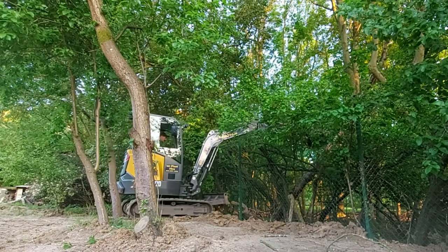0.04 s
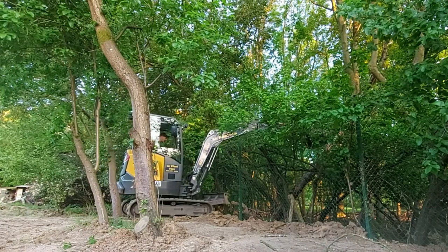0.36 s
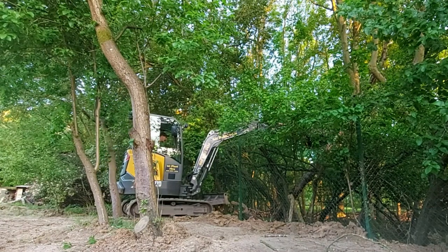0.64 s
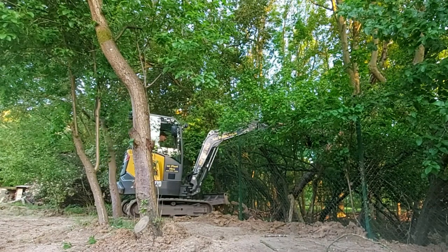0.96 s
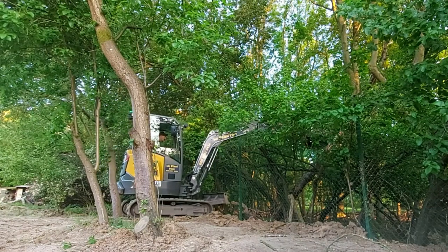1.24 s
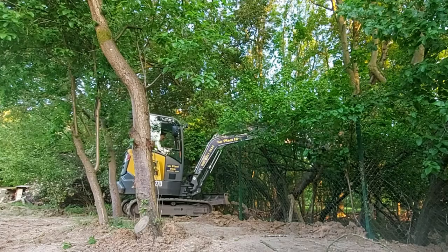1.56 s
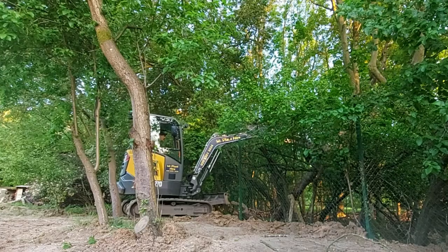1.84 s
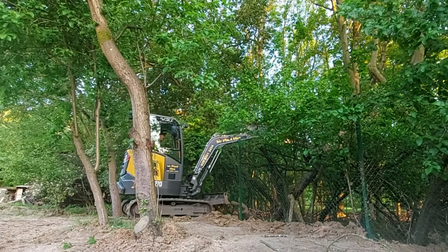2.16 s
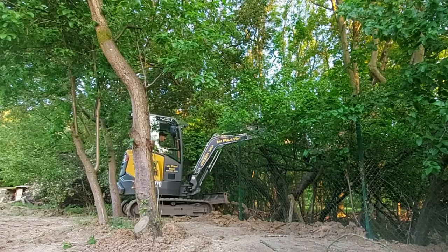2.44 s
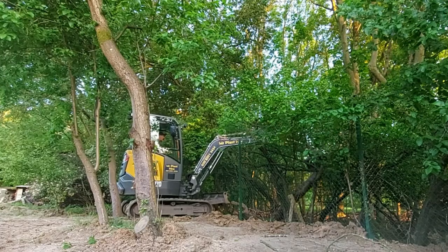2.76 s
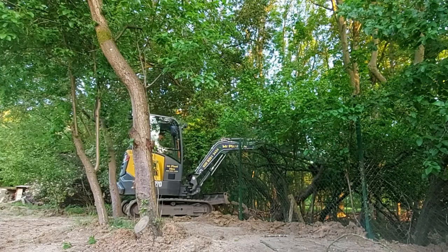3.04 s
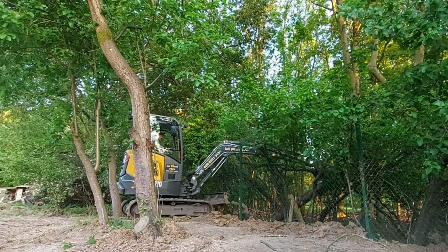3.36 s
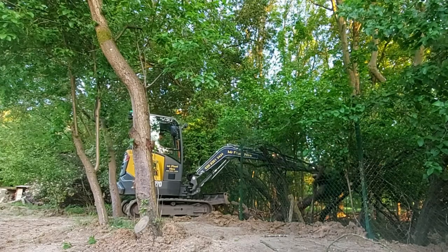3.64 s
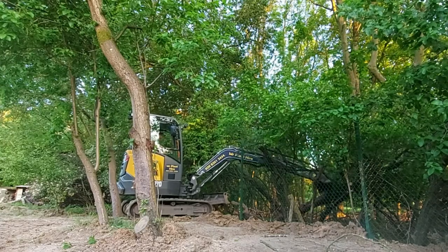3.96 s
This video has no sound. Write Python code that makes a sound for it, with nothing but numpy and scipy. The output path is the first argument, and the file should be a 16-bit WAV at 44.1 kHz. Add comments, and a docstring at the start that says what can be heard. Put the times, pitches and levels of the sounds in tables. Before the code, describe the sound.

A small diesel excavator runs steadily, clanks, then pushes through snapping branches and thrashing leaves.

```python
"""A small diesel excavator runs steadily some metres off in a wood; a bird whistles far away.
Its arm and bucket clank a few times, then press into a thicket, a little to the right: twigs snap,
branches crack and bump, leaves thrash. The engine is partials of the firing rate over combustion
noise, the clanks are a rattle over ringing steel, and the breaking wood is short noise bursts.
Hydraulics and distant foliage hiss; blows and whistles echo among the trees."""
import sys
import numpy as np
from scipy import signal
from scipy.fft import rfft, irfft, next_fast_len
from scipy.io import wavfile

SR = 44100
rng = np.random.default_rng(int(sys.argv[2]) if len(sys.argv) > 2 else 0)


def store_pcm(level_fs):
    """Save levels as 16-bit WAV."""
    pcm = np.round(np.clip(level_fs, -1, 1) * 32767).astype(np.int16)
    wavfile.write(sys.argv[1], SR, np.atleast_2d(pcm).T)


N = 176400
T = np.arange(N) / SR

ENGINE_LAG, BUCKET_LAG, THICKET_LAG = -9, 4.5, 12  # left behind right [samples]
TWIG_PAN_DB = np.array([[-1.4], [1.4]])  # left, right


def amp(db):
    """Decibels to gain."""
    return 10 ** (np.asarray(db) / 20)


def unit(x):
    """Scale to rms 1."""
    return x / np.sqrt(np.mean(x ** 2) + 1e-20)


def curve(points):
    """Breakpoints to a value per sample."""
    return np.interp(T, *np.transpose(points))


def read(points, hz):
    """Interpolate on a log-frequency axis."""
    f, value = np.transpose(points)
    return np.interp(np.log(hz + 1), np.log(f + 1), value)


def add(mix, start_s, sound):
    """Mix in a stereo sound, cropped to fit."""
    at = round(start_s * SR)
    sound = sound[:, max(-at, 0):]
    part = mix[:, max(at, 0):][:, :sound.shape[1]]
    part += sound[:, :part.shape[1]]


def drift(hz):
    """Random wander below hz, rms 1."""
    f = np.fft.rfftfreq(N, 1 / SR)
    return unit(irfft(rfft(rng.standard_normal(N)) / (1 + (f / hz) ** 4), N))


def noise(size, likeness, grain_db=0):
    """Stereo noise, left-right correlation = likeness; grain turns it into unequal clicks."""
    z = rng.standard_normal((3, size))
    z *= amp(grain_db * np.minimum(rng.exponential(1, (3, size)), 5))
    return unit(np.sqrt(likeness) * z[0] + np.sqrt(1 - likeness) * z[1:])


def colour(x, tone, lag, tilt_db_oct=0):
    """Shape the spectrum at equal power; delay the left side by lag samples."""
    size = next_fast_len(x.shape[1] + 256)
    f = np.fft.rfftfreq(size, 1 / SR)
    gain = unit(amp(read(tone, f) + tilt_db_oct * np.log2(f + 1)))
    delay = np.exp(-2j * np.pi * f / SR * np.array([[lag], [0]]))
    return irfft(rfft(x, size) * gain * delay, size)[:, :x.shape[1]]


def die_away(x, t60):
    """Decay each band at its own rate."""
    f, t, bands = signal.stft(x, SR, nperseg=256)
    decay = amp(-60 * t / read(t60, f)[:, None])
    return signal.istft(bands * decay, SR, nperseg=256)[1][:, :x.shape[1]]


def ring(modes, t, lag):
    """Decaying modes of random phase, in stereo."""
    late_s = t - np.array([[lag], [0]]) / SR
    return np.sqrt(2) * sum(amp(db - 60 * t / t60) * np.cos(2 * np.pi * (hz * late_s + rng.random()))
                            for hz, db, t60 in modes)


def engine(wobble=0.0042, wobble_hz=14.9, shimmer_db=0.5, clatter_db=-32.5):
    """Diesel: exhaust partials and a drone on the firing rate; clatter swells at each firing."""
    # engine speed (time [s], firing rate [Hz])
    speed = [(0.0, 62), (0.71, 62.6), (1.49, 61.4), (1.56, 62), (1.69, 61.6), (1.75, 61.7), (1.9, 60),
             (2.07, 62), (2.51, 62.1), (2.87, 61.0), (3.63, 61.2), (3.69, 61), (3.95, 62), (4.0, 60)]
    # exhaust and drive partials (multiple of firing rate, level [dB])
    orders = [(1, -26.5), (1.5, -66.5), (2, -22), (2.5, -42.5), (3, -41), (3.5, -63), (4, -36.5),
              (4.5, -40.5), (6, -49.5), (7, -51), (8, -53), (8.6, -52.5)]
    # exhaust swell (time [s], gain [dB])
    exhaust_gain = [(0, 1), (.6, 0.6), (1.5, 0.5), (2.1, 0), (2.9, -0.6), (3.5, 0.1), (4, 0.2)]
    # drone (time [s], level [dB])
    drone_level = [(0.0, -32), (0.08, -24), (0.37, -30), (0.6, -23.5), (0.78, -31.5), (0.98, -25.5),
                   (1.17, -29.5), (1.56, -25.5), (1.61, -50), (1.64, -28), (1.93, -23.5), (1.97, -34.5),
                   (2.17, -25.5), (2.41, -31), (2.62, -25), (2.87, -31.5), (2.99, -28), (4.0, -28)]
    # combustion and casing noise (frequency [Hz], relative level [dB])
    clatter_tone = [(8, -60), (25, -18), (45, -7), (90, 3.5), (160, -1.5), (280, 1.5), (370, -4),
                    (470, -12.5), (620, -14), (900, -13), (1400, -20.5), (2400, -21.5), (5000, -36),
                    (16000, -60)]
    rate_hz = curve(speed) * (1 + wobble * drift(wobble_hz))
    firings = np.cumsum(rate_hz) / SR - np.array([[ENGINE_LAG], [0]]) * rate_hz / SR

    def partial(order):
        return np.sqrt(2) * np.cos(2 * np.pi * (order * firings + rng.random()))

    exhaust = sum(amp(db + shimmer_db * drift(wobble_hz)) * partial(order) for order, db in orders)
    drone = amp(curve(drone_level)) * partial(order=5)
    phase = 2 * np.pi * firings[1]
    puffs = unit(np.exp(0.1 * np.cos(phase) + 0.18 * np.cos(phase / 2)))  # alternately strong, weak
    clatter = colour(noise(N, likeness=0.98) * puffs, clatter_tone, ENGINE_LAG)
    return amp(curve(exhaust_gain)) * exhaust + drone + amp(clatter_db) * clatter


def clanks(boom_rise_s=0.014):
    """Slack joints and the bucket knock: dense rattle, steel modes, low ring of the boom."""
    # knocks (time [s], rattle [dB], rise [s], tilt [dB/octave], boom [dB], steel [dB])
    knocks = [(1.553, -32, 0.0095, -4, -31, -42), (1.581, -15.5, 0.00086, 4, -31, -30.5),
              (1.594, -18, 0.0029, -2, -26, -29.5), (1.667, -40, .003, 10, -38, -60),
              (1.711, -19.5, .011, -0.5, -33, -39), (1.787, -26.5, .007, -1, -25.5, -42),
              (1.867, -21, .004, -3, -35, -38), (1.879, -18, 0.0056, -1.5, -26.5, -27),
              (1.96, -28.5, 0.009, -2, -30, -47), (2.2, -42, 0.0058, 1, -35.5, -54),
              (3.959, -25, 0.0037, 2, -40, -48), (3.976, -26, .004, 3, -29, -46)]
    # rattle spectrum (frequency [Hz], relative level [dB])
    rattle_tone = [(150, -31), (430, 3), (630, -12.5), (900, -0.5), (1400, -6), (2200, -4), (3300, -5),
                   (5000, -5), (7000, -16.5), (8500, -18), (9700, -39), (12000, -26), (16000, -42)]
    # rattle decay (frequency [Hz], T60 [s])
    rattle_t60 = [(300, 0.18), (1200, .21), (4000, 0.15), (12000, .1)]
    # steel modes (frequency [Hz], level [dB], T60 [s])
    steel_modes = [(872, -9, .3), (1125, -3, .16), (1238, -4, .2), (1357, -3, .26), (1460, -4, .2),
                   (1663, -6, .27), (1705, -7, .25), (1927, -7, .3), (2778, -13, .2), (3220, -10, .16),
                   (3871, -15, .22), (4307, -16, .15), (5297, -18, .16), (5868, -17, .18)]
    # boom modes (frequency [Hz], level [dB], T60 [s])
    boom_modes = [(245, -16.5, 0.6), (272.6, 11.5, 0.067), (315.6, -2.5, 0.68), (338, -16.5, 0.13),
                  (389, -3, .16), (443, 2.5, .17), (511, 0, 0.084)]
    out, t = np.zeros((2, N)), T[:SR // 2]
    for start_s, rattle_db, rise_s, tilt_db_oct, boom_db, steel_db in knocks:
        grit = colour(noise(len(t), likeness=0.72, grain_db=3), rattle_tone, BUCKET_LAG, tilt_db_oct)
        rattle = amp(rattle_db) * die_away(grit, rattle_t60)
        steel = amp(steel_db) * ring(steel_modes, t, BUCKET_LAG)
        boom = amp(boom_db) * ring(boom_modes, t, BUCKET_LAG)
        add(out, start_s, np.minimum(t / rise_s, 1) * (rattle + steel))
        add(out, start_s, np.minimum(t / boom_rise_s, 1) * boom)
    return out


def snaps(thicket_tone, snap_s=0.0018, splinter_s=0.016):
    """Wood breaks: one sharp snap, then a short spray of tearing fibres."""
    # breaks (time [s], snap [dB], splinter [dB], emphasis [Hz], roll-off [dB], left lag [samples])
    breaks = [ (2.7102, -32, -46, 9000, 6, 12), (2.769, -37.5, -42, 9000, 4, 11),
              (2.7897, -15.5, -36, 1400, 3, 5), (2.8713, -20.5, -50, 1800, 5, 4),
              (2.9222, -27.5, -28.5, 6996, 1.5, 12.5), (2.957, -29, -30.5, 8000, 8, 18),
              (3.145, -40, -33.5, 3005, 2, 4.1), (3.1873, -40, -40, 4000, 7, 12.5),
              (3.3176, -27, -30.5, 794, 3.5, 6.1), (3.3302, -19.5, -24, 4000, 7, 12.8),
              (3.336, -17, -23, 3500, 5, 12.6), (3.4252, -23, -45, 6000, 4, 11),
              (3.455, -23, -42, 4000, 7, 9.8), (3.4761, -29, -19.5, 3770, 4, 12.1),
              (3.477, -15, -33, 1010, 35, 10.7), (3.615, -11.5, -19, 5000, 3, 7.55),
              (3.6994, -32, -30, 1800, 3, 5), (3.8097, -31, -27, 7000, 8, 12.3),
              (3.865, -25, -29, 1190, 31, 14), (3.887, -20, -23.5, 5140, 2, 10.3)]
    out, t = np.zeros((2, N)), T[:SR // 5]
    f = np.geomspace(60, 16000, num=60)
    for start_s, snap_db, splinter_db, emphasis_hz, rolloff_db, lag in breaks:
        octaves = np.log2(f / emphasis_hz)
        cut_db = rolloff_db * octaves ** 2 / np.hypot(1, octaves / 2)
        tone = np.transpose([f, read(thicket_tone, f) - cut_db])
        snap = amp(snap_db) * np.exp(-t / snap_s) * noise(len(t), likeness=0.87)
        fibres = amp(splinter_db) * np.exp(-t / splinter_s) * noise(len(t), likeness=0.6, grain_db=4.5)
        add(out, start_s, colour(snap + fibres, tone, lag))
    return out * amp(TWIG_PAN_DB)


def bumps(rise_s=0.0014, decay_s=0.029):
    """Thick stems thud against the bucket."""
    # thuds (time [s], level [dB])
    thuds = [(2.792, -28.5), (2.818, -33), (3.318, -32), (3.702, -28), (3.744, -30), (3.79, -31),
             (3.836, -32), (3.875, -39), (3.988, -27)]
    # thud spectrum (frequency [Hz], relative level [dB])
    tone = [(60, -25), (160, -10), (400, -1.5), (550, -6.5), (800, -17), (2000, -20), (16000, -65)]
    out, t = np.zeros((2, N)), T[:SR // 4]
    envelope = np.minimum(t / rise_s, 1) * np.exp(-t / decay_s)
    for start_s, db in thuds:
        add(out, start_s, amp(db) * envelope * colour(noise(len(t), likeness=0.98), tone, BUCKET_LAG))
    return out


def leaves(thicket_tone, crossover_hz=3500, clump_db=1, cracks_per_s=70, crack_s=0.0005, crackle_db=-8):
    """Stems scrape, leaves slap in clumps around them, fine twigs crackle."""
    # thrashing (time [s], level [dB])
    level = [(0, -72), (2.68, -56), (2.79, -43), (2.91, -41.5), (2.96, -29.5), (3.0, -34.5), (3.12, -43),
             (3.2, -39.5), (3.31, -42), (3.35, -30), (3.39, -34), (3.46, -31), (3.5, -27.5), (3.55, -35),
             (3.605, -37.5), (3.635, -27.5), (3.69, -35), (3.76, -36), (3.815, -28.5), (3.86, -29.5),
             (3.89, -29), (3.935, -31), (4, -27.5)]
    treble = 1 / (1 + (crossover_hz / (np.fft.rfftfreq(N, 1 / SR) + 1)) ** 4)
    stems = irfft(rfft(noise(N, likeness=0.65, grain_db=2)) * np.sqrt(1 - treble), N)
    slaps = irfft(rfft(noise(N, likeness=0.22, grain_db=2)) * np.sqrt(treble), N)
    slaps *= amp([[-2.75], [2.75]])  # pan right
    impulses = rng.uniform(0.3, 1, N) * (rng.random(N) < cracks_per_s / SR)
    cracks = signal.lfilter([1], [1, -np.exp(-1 / (crack_s * SR))], impulses)
    crackle = unit(cracks * noise(N, likeness=0.85)) * amp(TWIG_PAN_DB)
    rustle = (stems + slaps) * amp(clump_db * drift(hz=129.6)) + amp(crackle_db) * crackle
    return amp(curve(level)) * colour(rustle, thicket_tone, THICKET_LAG)


def ticks(decay_s=0.0054):
    """Fine twigs tick lightly close by."""
    # twig ticks (time [s], level [dB])
    twigs = [(1.682, -43), (1.829, -38), (1.88, -47), (2.048, -45)]
    # tick spectrum (frequency [Hz], relative level [dB])
    tone = [(1000, -28), (6000, -1), (9500, 0), (14000, -3), (16000, -12)]
    out, t = np.zeros((2, N)), T[:SR // 5]
    for start_s, db in twigs:
        burst = colour(noise(len(t), likeness=0.6), tone, THICKET_LAG)
        add(out, start_s, amp(db) * np.exp(-t / decay_s) * burst)
    return out * amp(TWIG_PAN_DB)


def hiss(level_db=-44, flutter_db=0.5):
    """Hydraulics and distant foliage: steady, slightly restless noise."""
    # hiss spectrum (frequency [Hz], relative level [dB])
    tone = [(100, -31), (1000, 4.5), (2700, -2), (4200, 0), (5500, -4.5), (7000, -6), (8600, -6.5),
            (9700, -13), (12000, -7.5), (16000, -18.5)]
    gain = amp(level_db + flutter_db * drift(hz=25))
    return gain * colour(noise(N, likeness=0.29), tone, ENGINE_LAG)


def bird(echo_db=-11):
    """Pure gliding whistles, blurred by the trees."""
    # whistles (time [s], length [s], level [dB], start [Hz], middle [Hz], end [Hz])
    whistles = [(-.03, .08, -45, 2150, 2060, 1980), (.215, .045, -45, 2200, 2020, 1830),
                (.395, .1, -42, 2000, 1930, 1850), (.475, .07, -46, 1900, 2130, 2200),
                (.53, .12, -49, 2170, 2120, 2120), (.915, .1, -46, 2030, 1920, 2020)]
    out = np.zeros((2, N))
    for start_s, length_s, db, *pitches_hz in whistles:
        u = np.linspace(0, 1, int(length_s * SR))
        hz = np.polyval(np.polyfit([0, 0.5, 1], pitches_hz, 2), u)
        phase = 2 * np.pi * np.cumsum(hz) / SR + np.array([[1], [0]])  # left leads by 1 rad
        envelope = np.sqrt(abs(np.sin(np.pi * u)))
        add(out, start_s, amp(db) * envelope * np.sin(phase))
    return out + amp(echo_db) * tree_echo(out)


def tree_echo(x, rise_s=0.01):
    """Diffuse echoes from trunks and canopy."""
    # echo decay (frequency [Hz], T60 [s])
    t60 = [(200, 0.95), (1500, 0.81), (5000, 0.76), (14000, 0.52)]
    tail = die_away(noise(SR, likeness=0.34, grain_db=0.5), t60) * np.minimum(T[:SR] / rise_s, 1)
    return signal.fftconvolve(x, tail / np.linalg.norm(tail[0]), axes=1)[:, :N]


def scene(echo_db=-11.5):
    """The machine and the thicket among the trees."""
    # spectrum of leaves and breaking wood (frequency [Hz], relative level [dB])
    thicket_tone = [(100, -18), (500, -2.5), (1000, 0.5), (2300, -1), (3800, 1), (5500, -0.5), (7000, -3),
                    (8600, 1.5), (9600, -6.5), (12000, -1.5), (16000, -6)]
    blows = clanks() + snaps(thicket_tone) + ticks() + bumps()
    return engine() + hiss() + bird() + leaves(thicket_tone) + blows + amp(echo_db) * tree_echo(blows)


def record(dry, cutoff_hz=15800):
    """Steep low-pass on the top treble."""
    lowpass = signal.firwin(511, cutoff_hz, window=("kaiser", 9), fs=SR)
    return signal.oaconvolve(dry, lowpass[None], "same")


dry = scene()
out = record(dry)
store_pcm(out)
```